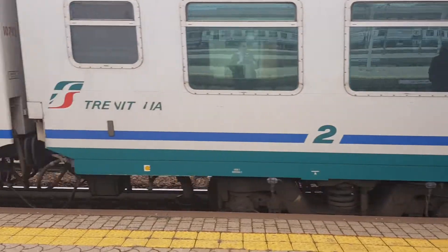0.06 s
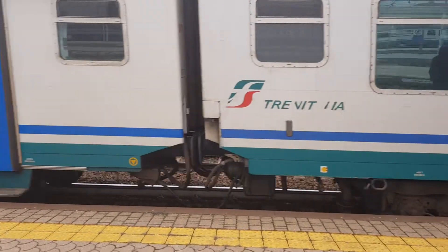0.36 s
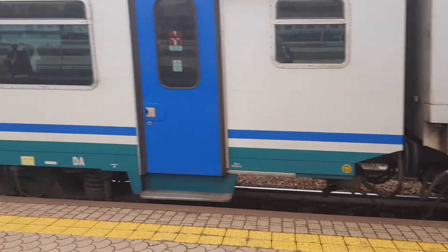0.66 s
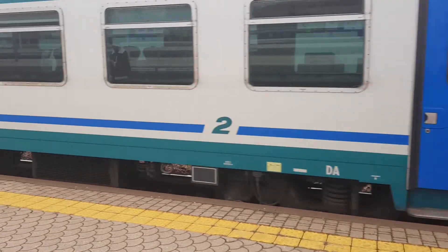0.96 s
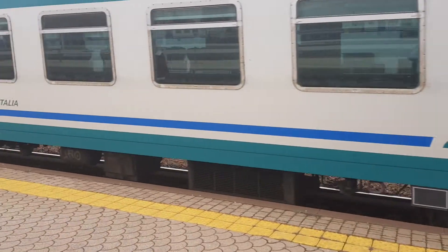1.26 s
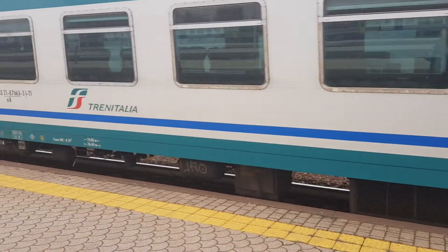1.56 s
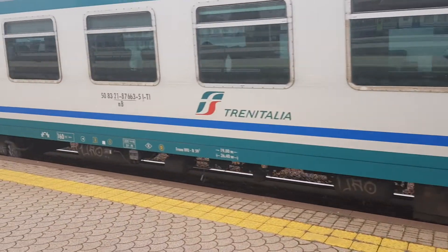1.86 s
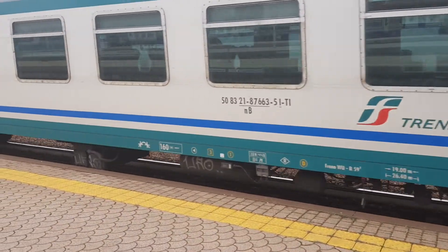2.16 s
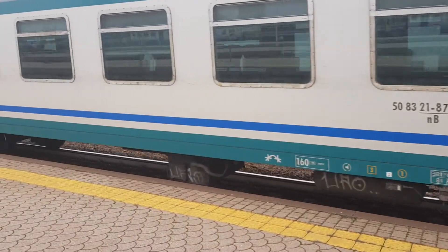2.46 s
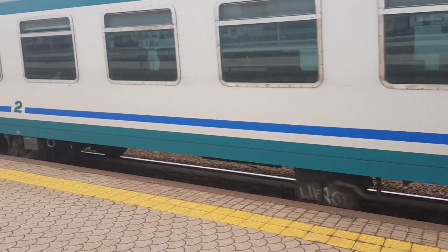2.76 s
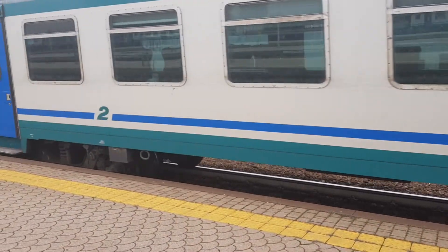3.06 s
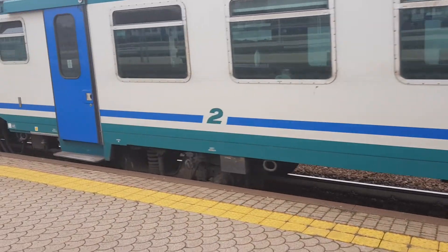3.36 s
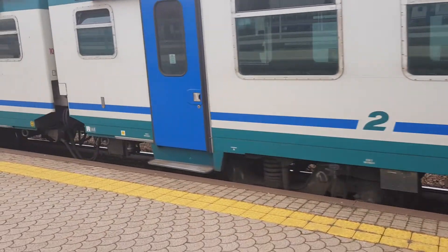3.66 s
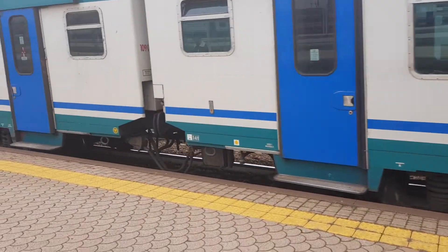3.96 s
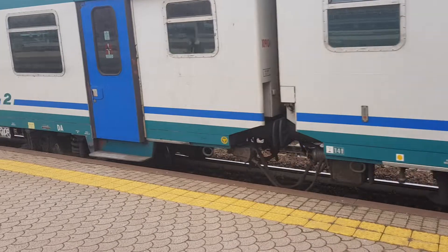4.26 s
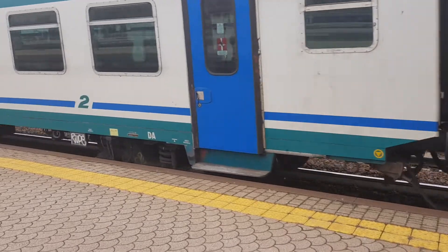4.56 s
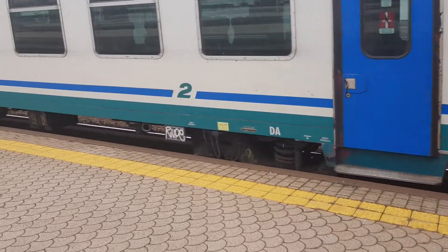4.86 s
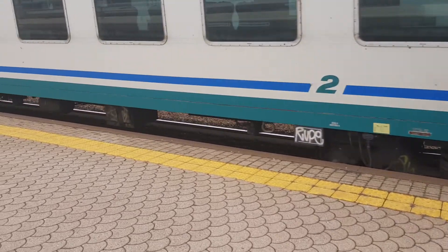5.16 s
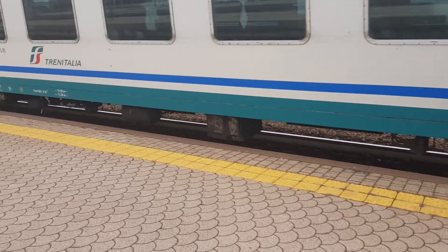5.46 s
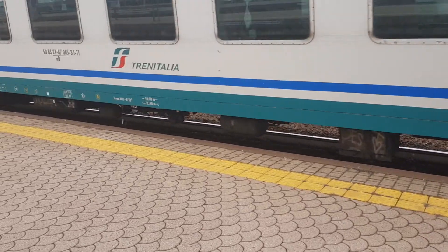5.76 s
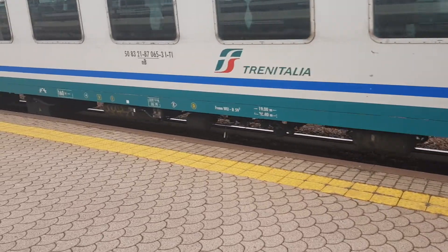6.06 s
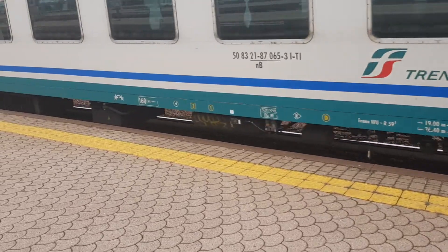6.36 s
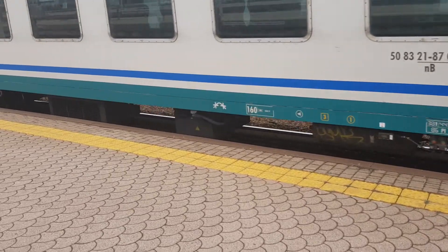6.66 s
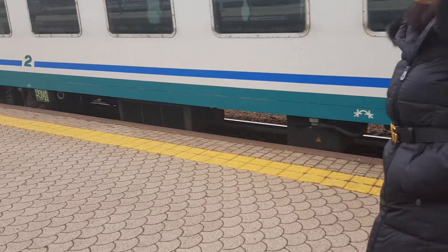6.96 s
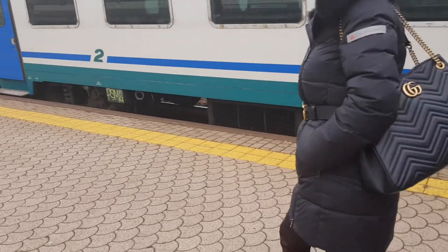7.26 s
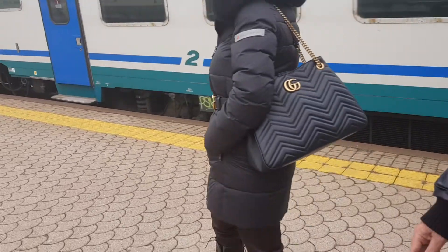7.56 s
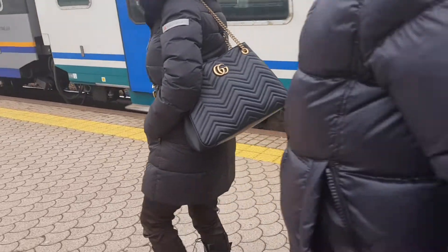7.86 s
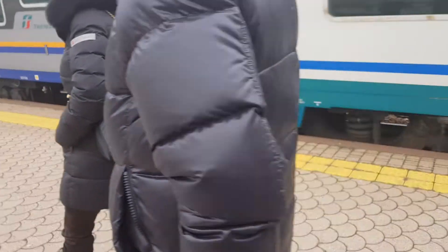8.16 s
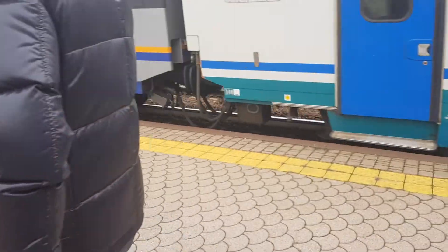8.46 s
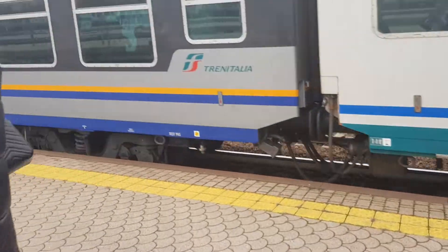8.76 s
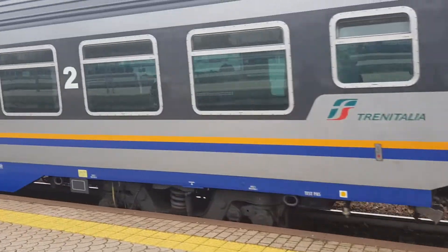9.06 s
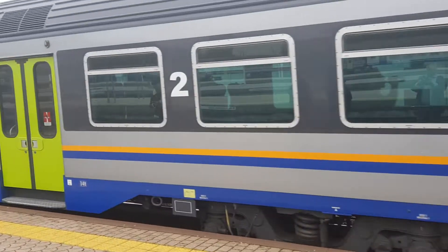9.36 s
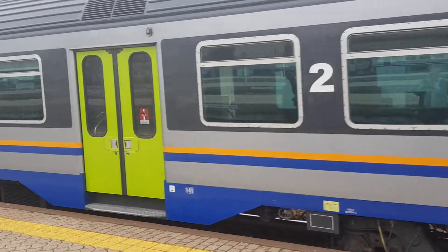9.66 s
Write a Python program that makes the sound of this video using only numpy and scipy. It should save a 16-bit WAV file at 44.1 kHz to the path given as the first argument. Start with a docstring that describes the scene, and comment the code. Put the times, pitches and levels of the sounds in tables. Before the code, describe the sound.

A passenger train brakes along a platform a few metres away, with a steady low rumble and a slowly fading wheel hiss. The brake blocks rasp, most strongly in the first two seconds. High chirps repeat with each wheel turn, loudest at the start and dying away by about 4.5 seconds, with scattered squeaks and gritty scuffs throughout. Axles thump over a rail joint in pairs at about 1, 2, 5 and 6.5 seconds, and singly near 3 and 9.5. Loose gear clanks now and then, most clearly just after 5 seconds, and the undercarriage groans around 1, 4 and 6 seconds. Between 7 and 8 seconds something small and metallic clinks faintly close by. From 7.5 seconds a wavering, ragged brake squeal approaches, growing louder as it sinks in pitch. It peaks just after 9 seconds and continues, with renewed rasping, until the end near 10.

```python
"""A passenger train brakes along a platform a few metres away, its wheels rumbling and hissing throughout.
First, friction makes the brake blocks rasp and, through the first half, chirp once a wheel turn.
From about 1 s, axles thump over a rail joint in pairs, loose gear clanks and bogie frames groan.
After 7 s something small clinks close by, and a wavering stick-slip squeal nears with the last
coaches, growing louder as it sinks in pitch."""
import sys
import numpy as np
from scipy import signal
from scipy.fft import rfft, irfft, next_fast_len
from scipy.io import wavfile
from scipy.ndimage import uniform_filter1d

SR = 44100
rng = np.random.default_rng(int(sys.argv[2]) if len(sys.argv) > 2 else 0)


def materialize(psi):
    """Save the field psi as 16-bit PCM at rate SR to the path in sys.argv[1].

    A 1-D psi becomes a single channel; in a 2-D psi each row is a channel.
    """
    bounded = np.clip(np.atleast_2d(psi).T, -1, 1)
    quanta = np.round(bounded * 32767).astype(np.int16)
    wavfile.write(sys.argv[1], SR, quanta)


N = 432168
TIME = np.arange(N) / SR

# spectra of coach rumble, wheel-rail roar, tread hiss and scuffing grit: f/Hz, relative density/dB
RUMBLE_SPECTRUM = [(25, -38), (45, -7), (62, 1), (100, 0.5), (125, -5.5), (165, -8.5), (230, -15),
                   (400, -25), (700, -48), (2000, -54.5)]
ROAR_SPECTRUM = [(150, 2.5), (850, 3.5), (1100, -1.5), (1450, -4), (2000, -2.5), (2850, -8.5), (3300, -8),
                 (4600, -10), (5500, -15.5), (7300, -12.5), (8500, -26.5), (16000, -33)]
HISS_SPECTRUM = [(800, -17), (2200, -2), (4500, 0.5), (5700, -5), (7100, 0.5), (8500, -8), (10000, -10),
                 (11700, -9), (12600, -17), (14200, -31), (16000, -33)]
GRIT_SPECTRUM = [(800, -25), (2100, 1.5), (3500, 0), (4600, -0.5), (7100, -2), (8700, -4.5), (10000, -3.5),
                 (11600, -6), (12600, -12), (13500, -17), (16000, -18)]
# course of the roar: t/s, level/dB
ROAR_LEVELS = [(0, -36), (1, -35.5), (1.7, -37.5), (4.6, -35.5), (8, -41), (9.1, -35.5), (9.8, -34)]
# rolling layers: base level/dB, greatest swell near the joint/dB, slope as the train slows/(dB/s)
RUMBLE_TREND = (-25, 2.6, -0.03)
BOGIE_TREND = (-35.5, 2.75, -0.21)
HISS_TREND = (-40.5, 2.77, -1.34)
# resonances of the bogie frame and of loose steel gear: f/Hz, half-width/Hz, relative level/dB
BOGIE_MODES = [(262, 88, -2.5), (390, 28.4, -6.5)]
GEAR_MODES = [(590, 97, -1), (808, 18, 1.5), (1140, 36, -7.5), (1287, 37, -8.5)]
# high wheel modes: f/Hz
WHEEL_MODES = [4400, 5280, 6540, 7130, 9870, 11400, 13400, 14100]
# tread scuffs away from the joint: t/s, half-length/s, level/dB
TREAD_SCUFFS = [(.13, .035, -36.5), (1.56, 0.055, -39), (2.63, 0.041, -37.5), (3.5, 0.099, -39.5),
                (3.79, 0.049, -40), (5.61, 0.022, -47), (5.78, 0.05, -39.5), (6.04, 0.029, -44),
                (6.54, 0.088, -41.5), (9.7, 0.16, -45.5)]
# axles at the joint: t/s, relative impact level/dB, relative spray level/dB, preceding scuff level/dB
AXLE_IMPACTS = [(.903, -17, -35, -38), (1.262, -17.5, -35.5, -47), (2.031, -19, -37, -44),
                (2.388, -18, -33, -59), (3.04, -24.5, -46, -64), (5.034, -18.5, -36.5, -39),
                (5.424, -17.5, -33, -42.5), (6.243, -16.5, -35.5, -46), (6.627, -16, -36, -50),
                (9.431, -17, -32.5, -39.5)]
# blows of loose gear: t/s, relative frame level/dB, relative steel level/dB
GEAR_BLOWS = [(.861, -21, -32.5), (2.735, -18, -56), (3.828, -15.5, -47), (4.221, -19, -27.5),
              (5.201, -11, -26.5), (5.627, -16, -38), (8.299, -20, -46)]
# brake blocks passing: peak t/s, rise/s, fall/s, low resonance level/dB, high resonance level/dB
BLOCK_PASSES = [(.64, .26, .42, -32, -37.5), (1.35, .25, .25, -48, -36.5), (2.1, .41, 1.5, -44, -58),
                (9.4, .15, .6, -47, -46)]
# chirping blocks: first t/s, end t/s, base period/s, nominal length/s, f/Hz, level/dB, fade/(dB/s)
CHIRP_TRAINS = [(.257, 2.9, .409, .08, 4685, -29.5, 4.3), (3.24, 4.7, .41, .13, 4640, -50.5, 2.5),
                (1.28, 2.3, .4, .07, 3200, -35.5, 7), (3.09, 4.5, .37, .08, 2970, -40.5, 6)]
# touch, bite and second catch within a chirp: delay/s, frequency ratio, relative level/dB
CHIRP_GRABS = [(-.036, 1.016, -7), (.006, .995, 0), (.098, 1.006, -8.5)]
# single squeaks: t/s, nominal length/s, f/Hz, level/dB, roughness (0-1)
LONE_SQUEAKS = [(0.263, .024, 4680, -24, 0.13), (.351, .023, 4700, -25.5, 0.13),
                (.838, .022, 3190, -27, .05), (1.517, .087, 3170, -27.5, 0.24),
                (1.661, 0.053, 3165, -26, 0.13), (3.444, 0.017, 7040, -37, .7),
                (5.36, 0.052, 7250, -41, .6), (6.83, .25, 7330, -49, .95), (7.475, .065, 5400, -50.5, .3),
                (8.245, 0.12, 7040, -49.5, 0.8), (9.167, 0.047, 3680, -36.5, 0.7),
                (9.615, .18, 3590, -45, .6)]
# course of the long squeal: t/s, f/Hz, level/dB, roughness (0-1)
SQUEAL_COURSE = [(7.53, 2050, -48, .05), (7.97, 2045, -44, .1), (8.12, 2004, -53, .1),
                 (8.44, 2290, -47, .6), (8.52, 2100, -47, .4), (8.61, 2200, -38, .3),
                 (8.79, 2070, -35, .04), (8.87, 2005, -36.5, .06), (9.04, 2005, -38, .05),
                 (9.15, 1936, -36, .2), (9.185, 1810, -36, .1), (9.245, 1983, -30, .1),
                 (9.29, 1810, -35.5, .08), (9.34, 1900, -37, .5), (9.385, 1690, -37, .06),
                 (9.63, 1790, -37.5, .45), (9.8, 1850, -37, .5)]
# moments when the squealing block loses its grip: t/s
SLIP_TIMES = [7.66, 8.735, 8.96, 9.52]
# bogie shudders: peak t/s, half-length/s, relative groan level/dB, relative boom level/dB
FRAME_SHUDDERS = [(0.983, 0.26, -27.5, -29), (3.83, 0.34, -27, -23.5), (4.244, 0.27, -28.5, -37),
                  (6.3, 0.39, -52, -28.5)]
# wheels ringing on one mode: peak t/s, half-length/s, f/Hz, level/dB
WHEEL_TONES = [(7, 2, 1297, -56), (9.35, .12, 3120, -39), (0.29, 0.086, 408, -34)]
# small metal contacts close by: t/s, relative level/dB
CLINK_HITS = [(7.322, -34), (7.328, -45), (7.977, -43), (8.028, -47)]
# their spectrum: f/Hz, relative density/dB
CLINK_SPECTRUM = [(3000, -26), (5200, 1), (8500, -4), (12000, 2), (16000, -8)]
# noise arriving straight along the track: f/Hz, relative direct share (0-1)
DIRECT_SHARE = [(200, 1), (600, 1), (1300, 0.33), (2200, 0.19), (5000, 0.08), (12000, 0)]

LEFT_LAG_S = 0.0004  # direct sound reaches the right microphone first


def rolling():
    """Forced vibration: rough treads shake coach, bogies and rail, all with one shared judder."""
    judder = wander(22)
    nearness = np.tanh(sum(gain_of(db + 22) * swell(s, 0.39) for s, db, *_ in AXLE_IMPACTS))

    def level_db(trend):
        """A layer swells while axles are near the joint and sinks with the speed."""
        db, swell_db, db_per_s = trend
        return db + swell_db * nearness + db_per_s * TIME

    rumble = noise(colour(RUMBLE_SPECTRUM)) * gain_of(level_db(RUMBLE_TREND) + 1.1 * judder)
    frames = noise(resonances(BOGIE_MODES)) * gain_of(level_db(BOGIE_TREND) + 2.2 * judder)
    roar = flicker(noise(colour(ROAR_SPECTRUM)), depth_db=2.5, size=4096, count=5)
    roar = roar * gain_of(follow(ROAR_LEVELS) + .5 * judder)
    return rumble + frames + roar + treads(gain_of(level_db(HISS_TREND) + judder))


def treads(hiss_gain):
    """Contact noise: treads hiss on the rail, and each scuff adds grit coloured by the wheel modes."""
    scuffs = [(s - 0.19, 0.039, db) for s, *_, db in AXLE_IMPACTS]  # just before the joint
    scuffs += list(TREAD_SCUFFS)
    scuff_gain = np.sqrt(sum(gain_of(db) ** 2 * swell(s, width) for s, width, db in scuffs))
    hiss = flicker(noise(colour(HISS_SPECTRUM)), depth_db=4.5, size=1024, count=5) * hiss_gain
    wheel = resonances([(hz, 130, 0) for hz in WHEEL_MODES])
    grit = noise(lambda hz: colour(GRIT_SPECTRUM)(hz) * (1 + .6 * wheel(hz)))
    grit = flicker(grit, depth_db=4, size=512, count=11) * scuff_gain * gain_of(wander(700))
    contact = (hiss + grit) * gain_of(wander(160))
    return contact + wheel_glints(np.hypot(0.84 * hiss_gain, 0.5 * scuff_gain))


def joint_impacts():
    """Impact excitation: each axle drops into the joint with a thump, a knock, a spray and a sizzle."""
    out = np.zeros((2, N))
    frame_modes = resonances([(152, 31, 7), (281, 122, 9), (467, 1100, -21.5)])
    for s, db, spray_db, _ in AXLE_IMPACTS:
        add(out, s, gain_of(db + 4.5) * thump(hz=78, hold=.036, decay=.012))
        add(out, s, gain_of(db - 5) * burst(frame_modes, rise=.0035, hold=.025, decay=.023))
        spray = burst(colour(GRIT_SPECTRUM), rise=.022, hold=.034, decay=.045)
        add(out, s - .01, gain_of(spray_db - 2.5 + 2.2 * wander(350, spray.shape[1])) * spray)
        add(out, s, gain_of(spray_db) * sizzle())
    return out


def thump(hz, hold, decay):
    """Damped oscillation: the wheelset bounces unevenly on the sleepers, the first cycle quicker."""
    t = np.arange(SR // 5) / SR
    pitch = hz * (1 + 0.61 * np.exp(-t / 0.013) + 0.16 * wander(102, len(t)))
    bounce = np.sin(phase_of(pitch)) * np.exp(-np.maximum(t - hold, 0) / decay)
    return np.array([bounce, bounce])


def sizzle():
    """Modal response: the struck wheel chatters in its high modes, each blow favouring different ones."""
    modes = [(hz, 150, 3 * rng.standard_normal() - hz / 2000) for hz in WHEEL_MODES]
    ring = burst(resonances(modes), rise=.012, hold=.035, decay=.04)
    return ring * gain_of(2 * wander(200, ring.shape[1]) - 3)


def brake_rasp():
    """Sliding friction drives two resonances in spurts; the lower partly sings, higher under pressure."""
    low_power, high_power = 0, 0
    for s, rise, fall, low_db, high_db in BLOCK_PASSES:
        nearness = 1 / (1 + ((TIME - s) / np.where(TIME < s, rise, fall)) ** 2)
        low_power += gain_of(low_db) ** 2 * nearness
        high_power += gain_of(high_db) ** 2 * nearness
    pressure = np.sqrt(low_power / low_power.max())
    pitch = 1635 * (1 + .07 * pressure * (1 + .4 * wander(14)))
    sung = platform(stick_slip(pitch, jitter=.016, flutter_db=3, overtone_db=-22), wet_db=-2, t60=.25)
    scraped = noise(resonances([(1820, 154, 7), (1676, 45, 0.92)]), focus=1.6)
    high = noise(resonances([(3233, 55, 3), (3484, 180, 1.5)]))
    high = flicker(high, depth_db=5, size=1024, count=6)
    low = blend(scraped, sung, share=.62) * np.sqrt(low_power) * gain_of(0.81 * wander(60))
    return low + high * np.sqrt(high_power) * gain_of(2 * wander(45))


def brake_chirps():
    """Periodic contact: blocks grab as a slowing wheel's high spot comes round; others squeak once."""
    sag_per_s, period_growth = 0.00377, .009  # pitch sinks as the wheel moves off; its turns lengthen
    out = np.zeros((1, N))
    for s, length, hz, db, rough in LONE_SQUEAKS:
        add(out, s, squeak(length, hz, db, rough))
    for first, end, period, length, hz, first_db, fade_db_per_s in CHIRP_TRAINS:
        s = first
        while s < end:
            db = first_db - fade_db_per_s * (s - first)
            pitch = hz * (1 - sag_per_s * (s - first))
            for delay, ratio, grab_db in CHIRP_GRABS:
                grab = squeak(length, pitch * ratio, db + grab_db, rough=.27, taper=.6)
                add(out, s + delay - length / 2, grab)
            s += period + period_growth * s
    return platform(out[0], wet_db=-2, t60=0.3)


def brake_squeal():
    """Self-excited oscillation: a sinking whistle that hops between neighbouring modes when ragged."""
    hop_share, hops_per_s, slip_db = 0.038, 30, -25
    rough = follow(SQUEAL_COURSE, column=3)
    hops = [hop_share * rough * np.tanh(2 * wander(hops_per_s)) for _ in range(2)]
    tone_hz, chatter_hz = [follow(SQUEAL_COURSE) * (1 + hop) for hop in hops]
    grip_db = slip_db * sum(swell(s, 0.02) for s in SLIP_TIMES) + 1.2 * wander(30)
    onset = np.clip((TIME - SQUEAL_COURSE[0][0]) / 0.02, 0, 1)
    level = gain_of(follow(SQUEAL_COURSE, column=2) + grip_db) * onset
    tone = stick_slip(tone_hz * (1 + .003 * wander(30)), jitter=.012, flutter_db=3, overtone_db=-13)
    chatter = stick_slip(chatter_hz * (1 + .025 * wander(60)), jitter=.034, flutter_db=4, overtone_db=-7)
    return platform(level * blend(tone, chatter, rough), wet_db=-10, t60=0.26)


def squeak(length, hz, db, rough, taper=0.21):
    """Brief stick-slip: a tone that random frequency modulation broadens into a scrape when rough."""
    size = int((length + 0.011) * SR)
    pitch = hz * (1 + 0.0145 * rough * wander(41, size))
    tone = stick_slip(pitch, jitter=.0067, flutter_db=5, overtone_db=-24)
    scrape = stick_slip(pitch, jitter=.028, flutter_db=3.5, overtone_db=-27)
    return gain_of(db) * unit_rms(blend(tone, scrape, rough) * signal.windows.tukey(size, taper))[None]


def stick_slip(hz, jitter, flutter_db, overtone_db):
    """Mode locking: stick-slip settles on a wheel mode; its pitch trembles, its grip comes and goes."""
    phase = phase_of(hz * (1 + jitter * wander(260, len(hz))))
    overtones = sum(weight * np.sin(n * phase) * (n * hz < SR / 2)
                    for n, weight in [(2, 1), (3, .7), (4, .4)])
    tone = np.sin(phase) + gain_of(overtone_db) * overtones
    return unit_rms(tone * gain_of(flutter_db * wander(75, len(hz))))


def gear_clanks():
    """Free decay: blows of couplings and rigging ring in the bogie frame and the steel gear."""
    out = np.zeros((2, N))
    for s, frame_db, steel_db in GEAR_BLOWS:
        frame = burst(resonances(BOGIE_MODES), rise=.0046, hold=.0054, decay=.027)
        steel = burst(resonances(GEAR_MODES), rise=.0033, hold=.0063, decay=.028)
        add(out, s, gain_of(frame_db - 11) * frame + gain_of(steel_db - 2.5) * steel)
    return out


def bogie_groans():
    """Resonance: now and then a bogie frame shudders unevenly in two low modes."""
    groan_gain = sum(gain_of(db) * swell(s, width) for s, width, db, _ in FRAME_SHUDDERS)
    boom_gain = sum(gain_of(db) * swell(s, width) for s, width, _, db in FRAME_SHUDDERS)
    groan = noise(resonances([(284.4, 32.5, 0)])) * groan_gain
    boom = noise(resonances([(115, 39, 0)])) * boom_gain
    return (groan + boom) * gain_of(3 * wander(24) - 1.2)


def wheel_rings():
    """Narrow resonance: passing wheels ring faintly, each on one mode, the lowest a soft moan."""
    out = np.zeros(N)
    for s, width, hz, db in WHEEL_TONES:
        tone = np.sqrt(2) * np.sin(phase_of(hz + 9 * wander(60)))
        out += gain_of(db) * swell(s, width) * tone
    return platform(out, wet_db=-3, t60=0.33)


def wheel_glints(tread_gain, count=90):
    """Random excitation: high wheel modes give brief, thin squeaks that scale with the tread noise."""
    out = np.zeros((1, N))
    for when, mode, detune, weakness in rng.random((count, 4)):
        hz = WHEEL_MODES[int(mode * len(WHEEL_MODES))] * (1 + 0.04 * (detune - .5))
        db = -2.5 + .5 * spectrum_at(HISS_SPECTRUM, hz) - 8 * weakness
        add(out, when * N / SR, tread_gain[int(when * N)] * squeak(0.1, hz, db, rough=0.28))
    return platform(out[0], wet_db=7, t60=0.58)


def clinks():
    """Short impacts radiate treble: small metal parts tick close by, as on a zip or a bag chain."""
    out = np.zeros((2, N))
    for s, db in CLINK_HITS:
        tick = burst(colour(CLINK_SPECTRUM), rise=.003, hold=.0035, decay=.003)
        tail = burst(colour(CLINK_SPECTRUM), rise=.002, hold=.004, decay=.03)
        add(out, s, gain_of(db - 8) * (tick + 0.66 * tail))
    return out


def platform(x, wet_db, t60):
    """Reverberation: coach sides and platform scatter a tail behind the direct sound from the right."""
    t = np.arange(SR // 2) / SR
    echoes = rng.standard_normal((2, len(t))) * (rng.random((2, len(t))) < .05) * gain_of(-60 * t / t60)
    echoes /= np.linalg.norm(echoes, axis=1, keepdims=True)
    tail = signal.oaconvolve(x[None], echoes, axes=1)[:, :N]
    direct = np.array([np.roll(x, round(LEFT_LAG_S * SR)), x])
    return (direct + gain_of(wet_db) * tail) / np.hypot(1, gain_of(wet_db))


def noise(shape, size=N, focus=0.91):
    """Partial coherence: coloured stereo noise, part arriving from the right, the rest diffuse."""
    length = next_fast_len(size)
    hz = np.fft.rfftfreq(length, 1 / SR)
    left, independent = rfft(rng.standard_normal((2, length)))
    direct = np.clip(spectrum_at(DIRECT_SHARE, hz) * focus, 0, .95)
    # the bass comes from the coach straight ahead and reaches both sides at once
    lag_cycles = hz * LEFT_LAG_S * hz ** 2 / (hz ** 2 + 330 ** 2)
    coherence = .98 * (direct * np.exp(2j * np.pi * lag_cycles) + (1 - direct) * np.sinc(2 * lag_cycles))
    right = coherence * left + np.sqrt(1 - abs(coherence) ** 2) * independent
    return unit_rms(irfft(np.array([left, right]) * shape(hz), length)[:, :size])


def burst(shape, rise, hold, decay, size=12000):
    """A noise transient that swells, holds and decays, with the energy of 1/20 s at rms 1."""
    t = np.arange(size) / SR
    envelope = np.minimum(t / rise, 1) * np.exp(-np.maximum(t - hold, 0) / decay)
    return unit_rms(noise(shape, size) * envelope) * np.sqrt(SR / 20 / size)


def flicker(x, depth_db, size, count):
    """Random modulation: modes flare and fade, narrower with frame size, longer with frame count."""
    spectra = signal.stft(x.astype(np.float32), nperseg=size)[2]
    patches = uniform_filter1d(rng.standard_normal(spectra.shape[1:]), size=3, axis=0)
    patches = unit_rms(uniform_filter1d(patches, size=count, axis=1))
    flared = spectra * gain_of(depth_db * np.minimum(patches, 3))
    return unit_rms(signal.istft(flared, nperseg=size)[1][:, :N])


def resonances(modes):
    """Gain against frequency of Lorentzian peaks: f/Hz, half-width/Hz, level/dB."""
    return lambda hz: sum(gain_of(db) / (1 + ((hz - f) / width) ** 2) for f, width, db in modes)


def colour(points):
    """Gain against frequency of a spectrum table."""
    return lambda hz: gain_of(spectrum_at(points, hz))


def spectrum_at(points, hz):
    """Interpolation on a log-frequency axis."""
    f, value = np.transpose(points)
    return np.interp(np.log(hz + 1), np.log(f + 1), value)


def follow(rows, column=1):
    """Linear interpolation of one column at every sample."""
    rows = np.asarray(rows)
    return np.interp(TIME, rows[:, 0], rows[:, column])


def wander(rate, size=N):
    """A random process of rms about 1 that changes `rate` times a second."""
    knots = rng.standard_normal(8192)
    return np.interp(np.arange(size) * rate / SR % 8191, np.arange(8192), knots) * np.sqrt(3 / 2)


def swell(s, width):
    """A Gaussian envelope of height 1 around time s."""
    out, near = np.zeros(N), abs(TIME - s) < 4 * width
    out[near] = np.exp(-((TIME[near] - s) / width) ** 2)
    return out


def phase_of(hz):
    """Phase is the time integral of frequency."""
    return 2 * np.pi * np.cumsum(hz) / SR


def blend(a, b, share):
    """Incoherent signals add in power; b takes the given share."""
    return np.sqrt(1 - share) * a + np.sqrt(share) * b


def add(mix, s, sound):
    """Superposes a sound on the mix at time s."""
    part = mix[:, max(round(s * SR), 0):][:, :sound.shape[1]]
    part += sound[:, :part.shape[1]]


def gain_of(db):
    """Decibels to amplitude."""
    return 10 ** (np.asarray(db) / 20)


def unit_rms(x):
    """Normalisation to rms 1."""
    return x / np.sqrt(np.mean(x ** 2) + 1e-20)


def scene():
    """Superposition of all sources, a little stronger on the left."""
    mix = rolling() + bogie_groans() + joint_impacts() + gear_clanks()
    mix += brake_rasp() + wheel_rings() + brake_chirps() + brake_squeal() + clinks()
    return mix * gain_of([[.4], [-.4]])


def record(dry):
    """Band limiting: filters pass 40 Hz to 15.85 kHz."""
    bass_cut = signal.sosfilt(signal.butter(4, 40, "highpass", fs=SR, output="sos"), dry)
    lowpass = signal.firwin(1023, 15850, window=("kaiser", 9), fs=SR)
    return signal.oaconvolve(bass_cut, lowpass[None], "same")


dry = scene()
out = record(dry)
materialize(out)
```